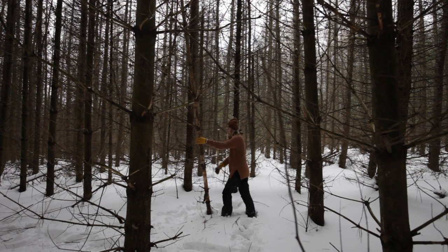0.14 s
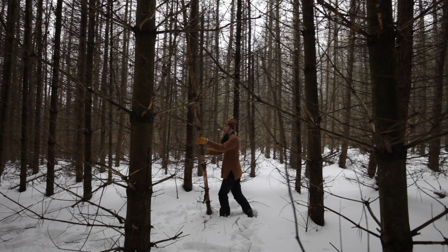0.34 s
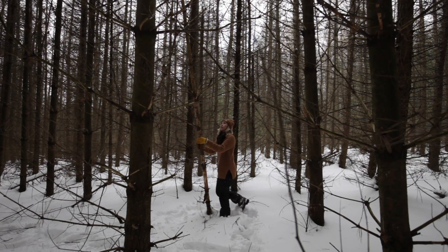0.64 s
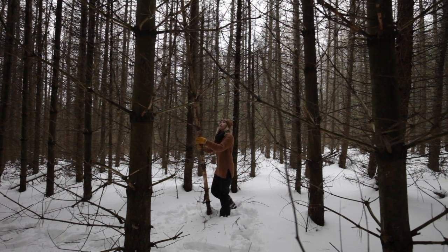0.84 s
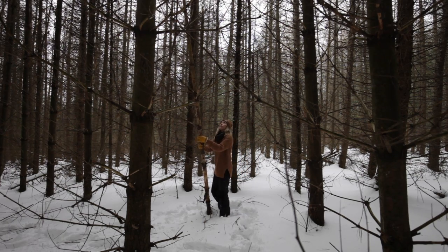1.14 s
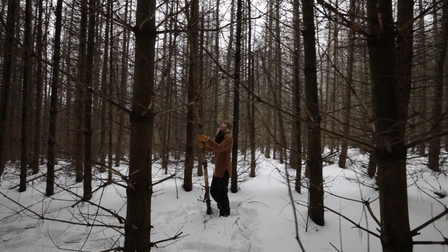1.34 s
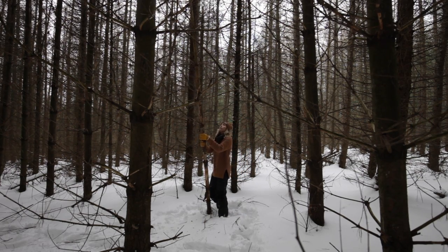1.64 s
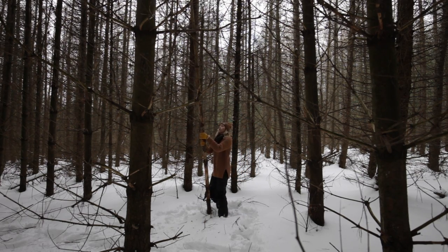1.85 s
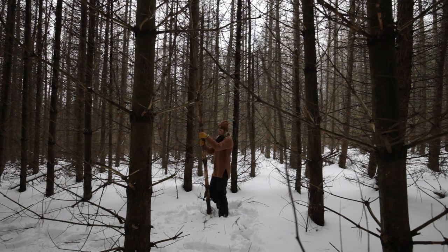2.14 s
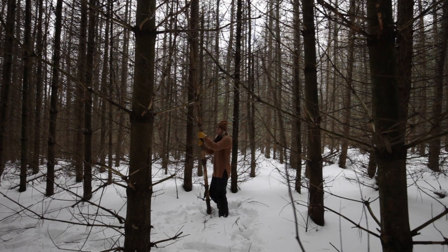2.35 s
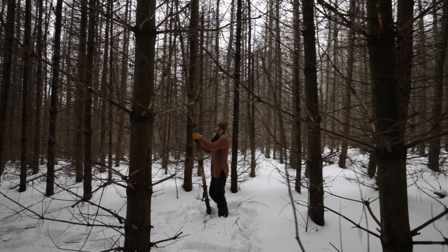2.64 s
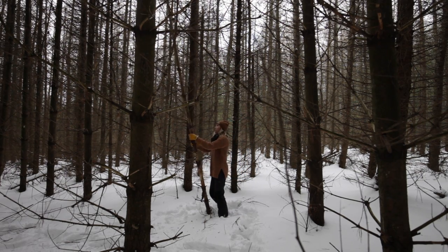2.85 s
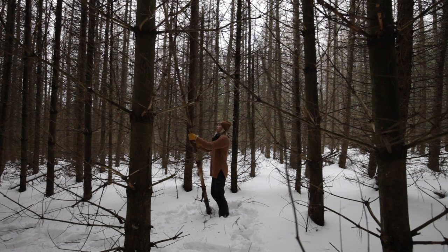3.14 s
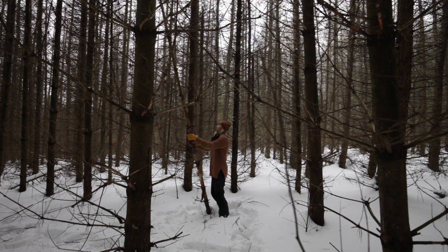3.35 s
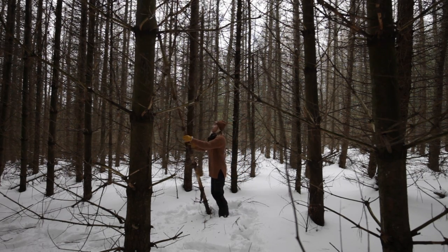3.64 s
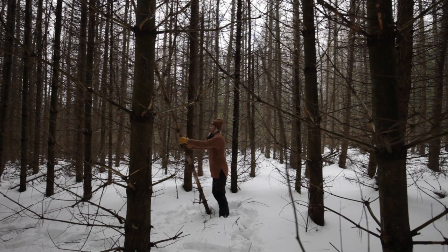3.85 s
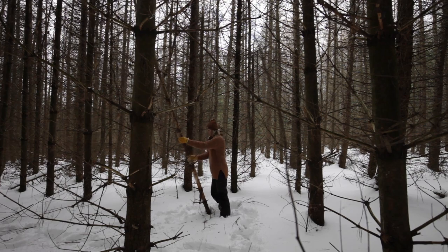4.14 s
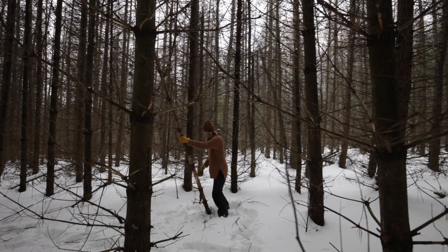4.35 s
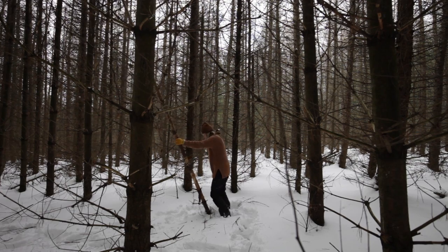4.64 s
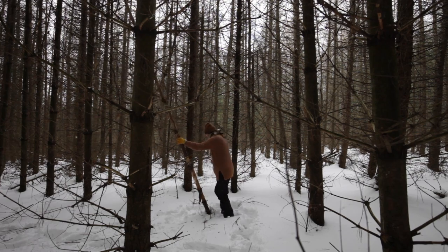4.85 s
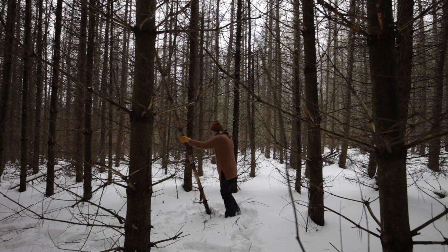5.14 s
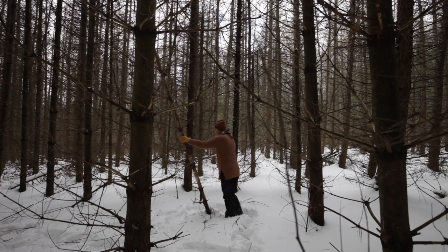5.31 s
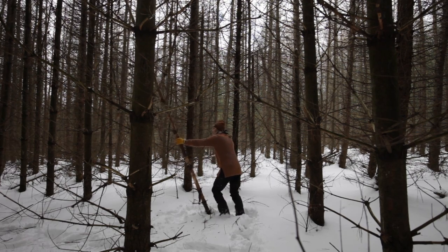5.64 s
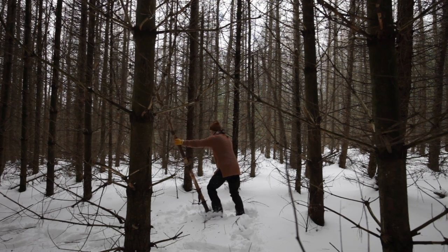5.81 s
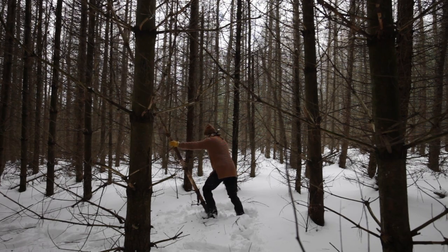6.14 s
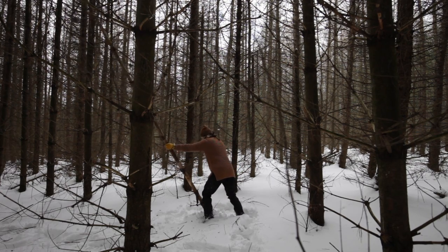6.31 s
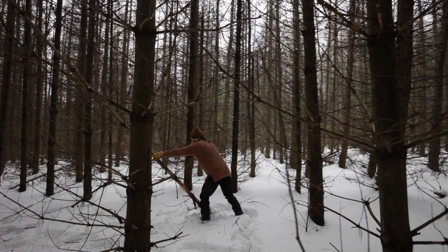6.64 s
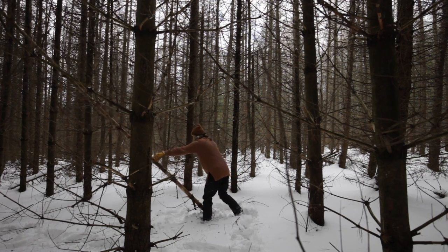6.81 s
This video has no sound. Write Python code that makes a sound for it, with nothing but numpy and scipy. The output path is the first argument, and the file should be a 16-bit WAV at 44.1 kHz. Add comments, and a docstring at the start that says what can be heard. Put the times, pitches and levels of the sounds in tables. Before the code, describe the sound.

Dry twigs crackle and snap in clumped bursts as a dead tree is shoved over in snowy woods, with dull boot thuds and a big crack near the end.

```python
"""Pushing over a dead tree in a snowy wood

A dead tree is rocked and pushed over by hand, shove by shove: each builds up strain, then lets go.
Dry fibres and twigs snap as noise bursts coloured by pitch; the brittle crown crackles and scrapes in
clumped ticks and knocks through its neighbours in short rings. Dull low pushes are boots treading the snow
and the trunk shifting. Shaped noise makes the air; near and far trunks scatter a short echo of the wood."""
import sys
import numpy as np
from scipy import signal
from scipy.fft import rfft, irfft
from scipy.io import wavfile
from scipy.ndimage import uniform_filter1d

SR = 44100
rng = np.random.default_rng(int(sys.argv[2]) if len(sys.argv) > 2 else 0)


def master(y):
    """Save y as 16-bit WAV."""
    cut = np.clip(np.atleast_2d(y).T, -1, 1)
    pcm = np.round(cut * 32767)  # scale
    wavfile.write(sys.argv[1], SR, pcm.astype(np.int16))


N = 307377


def gain_of(db):
    """Decibels to amplitude."""
    return 10 ** (np.asarray(db) / 20)


def evened(x):
    """Scales to rms 1."""
    return x / np.sqrt(np.mean(x ** 2) + 1e-20)


def read(points, hz):
    """Reads a table of values against frequency on a log-frequency axis."""
    f, value = np.transpose(points)
    return np.interp(np.log(hz + 1), np.log(f), value)


def add(mix, s, sound):
    """Mixes a sound in at time s."""
    part = mix[max(round(s * SR), 0):][:len(sound)]
    part += sound[:len(part)]


def coloured(x, spectrum):
    """Gives x a spectrum, at rms 1."""
    hz = np.fft.rfftfreq(len(x), 1 / SR)
    return evened(irfft(rfft(x) * gain_of(read(spectrum, hz)), len(x)))


def lumpy(first_size, second_size):
    """Slow random swells at rms 1: noise averaged twice over these numbers of samples."""
    once = uniform_filter1d(rng.standard_normal(N), size=first_size)
    return evened(uniform_filter1d(once, size=second_size))


def causal(db):
    """Frequency response with this gain that rings only after it is struck."""
    log_gain = np.log(gain_of(np.r_[db, db[-2:0:-1]]))
    return np.exp(np.conj(signal.hilbert(log_gain)))[:len(db)]


# wandering level of the low rumble: time_s, level_db
RUMBLE_LEVEL = [(0.0, -57), (0.35, -54.5), (1.1, -68), (1.55, -57), (2.0, -65), (2.4, -68), (2.9, -54.5),
                (3.3, -70), (3.6, -58), (3.86, -55.5), (4.4, -50), (4.78, -64.5), (5.15, -56), (5.4, -47),
                (5.52, -55), (5.88, -48), (6.2, -71), (6.5, -55), (6.97, -59.5)]


def low_rumble(gust_db=4.0):
    """A lumpy low rumble under the wood: bass noise on a wandering level with random gusts."""
    bass = [(15, -4.5), (40, 8.0), (110, 1.5), (220, -12), (600, -12.5), (3000, -64)]  # hz, dB per Hz
    rumble = coloured(rng.standard_normal(N), bass)
    wander_db = np.interp(np.arange(N) / SR, *np.transpose(RUMBLE_LEVEL))
    return rumble * gain_of(wander_db + gust_db * np.tanh(lumpy(3000, 1500)))


RUSH_DB, RUSH_ENDS_S, RUSH_FADE_DB_PER_S, STILL_DB = -47, 1.83, 26, -61
# relative spectrum of the air among the trees: frequency_hz, level_db (per Hz)
RUSH_SPECTRUM = [(20, -20), (100, -2), (180, 0), (300, 1), (800, -1), (1200, -3.5), (2000, -19),
                 (7000, -23), (11000, -25.5), (16000, -35)]


def rush():
    """A soft rush of air among the trees, steady noise that fades to a still floor."""
    t = np.arange(N) / SR
    breeze = gain_of(RUSH_DB - RUSH_FADE_DB_PER_S * np.maximum(t - RUSH_ENDS_S, 0))
    return coloured(rng.standard_normal(N), RUSH_SPECTRUM) * np.hypot(breeze, gain_of(STILL_DB))


# a heavy tread also crushes the crust, which sounds higher; below HEAVY_DB the crust weakens further
CRUST_DB, CRUST_HZ, CRUST_DELAY_S, HEAVY_DB = -8, 270, 0.0033, -17
# dull thuds of boots and trunk: time_s, level_db, pitch_hz
THUDS = [(0.094, -38, 111), (0.17, -40, 135), (0.538, -35.5, 121), (1.605, -37, 150), (2.573, -38, 73),
         (3.063, -37, 116), (3.85, -43, 64), (4.032, -40, 131), (4.267, -37, 99), (4.3, -28.5, 74.5),
         (4.944, -34.5, 82), (5.254, -21.5, 103), (5.287, -29, 126), (5.348, -21, 112), (5.571, -30, 128),
         (5.635, -37, 74), (5.749, -40, 130), (5.801, -40, 74.5), (5.932, -35, 68), (6.815, -38.5, 116)]


def thuds(swell_s=0.0094, cycles=0.67, settle_s=0.017, settle_db=-9.0):
    """A soft push of a cycle or two, then a short rumble as the snow packs down."""
    out, t = np.zeros(N), np.arange(-1024, 8192) / SR
    snow = [(15, -38), (45, -5.0), (130, -3.5), (280, -15.0), (500, -29.0), (2000, -44), (8000, -85)]
    for s, level_db, hz in THUDS:
        push = np.exp(-(t * hz / cycles) ** 2) * np.cos(2 * np.pi * (hz * t + rng.random()))
        crust = np.exp(-((t - CRUST_DELAY_S) * CRUST_HZ / 2) ** 2)
        crust *= np.cos(2 * np.pi * (CRUST_HZ * t + rng.random()))
        crust *= gain_of(CRUST_DB + min(level_db - HEAVY_DB, 0))
        rumble = coloured(rng.standard_normal(len(t)), snow)
        packing = np.exp(np.minimum(t / swell_s, -t / settle_s))
        thud = push + crust + gain_of(settle_db) * rumble * packing
        add(out, s + t[0], gain_of(level_db) * thud)
    return out


# a shove bites, builds from slack to full strain, eases off a little, then lets go
BITE_S, SLACK_DB, EASE_DB_PER_S, LET_GO_DB_PER_S = 0.017, -9, 7, 90
# once let go, the crown sways and rustles on
SWAY_DB, SWAY_FADE_DB_PER_S = -11.5, 13
TWIGS_AT_REST_DB, LIMBS_AT_REST_DB = -53.5, -56
# shoves dragging the crown through other branches, with drag levels at full strain:
# start_s, end_s, build_s (to full strain), twigs_db, limbs_db, boughs_db
SHOVES = [(-.03, 0.43, 0.2, -59, -69, -61), (1.067, 1.31, .14, -40, -47, -56),
          (1.298, 1.364, 0.033, -28.5, -45, -64), (1.4, 1.644, 0.055, -29, -37, -49.5),
          (1.63, 1.844, 0.069, -22, -39, -43), (1.837, 2.13, 0.098, -24.5, -32, -46),
          (2.446, 3.084, 0.39, -31.5, -43.5, -44.5), (3.405, 4.103, 0.39, -31.5, -37.5, -51.5),
          (4.216, 4.33, 0.031, -44.5, -49, -55.5), (4.394, 4.695, .04, -41.5, -46, -52.5),
          (4.902, 5.22, 0.028, -45.5, -49.5, -57.5), (5.49, 5.975, 0.16, -46.5, -51, -55),
          (5.927, 6.185, 0.22, -38, -43.5, -62), (6.215, 6.38, 0.079, -31, -37, -57),
          (6.406, 6.604, 0.12, -32, -40, -65), (6.615, 6.766, 0.071, -37.5, -35, -63),
          (6.896, 7.002, 0.077, -34.5, -43, -64)]


def drag():
    """How hard twigs, limbs and boughs are moved: each shove builds strain, then releases it."""
    t = np.arange(N) / SR
    power = np.zeros((3, N))
    for start, end, build, *levels_db in SHOVES:
        first = max(round(start * SR), 0)
        age = t[first:] - start
        slack_db = SLACK_DB * np.clip(1 - age / build, 0, 1)
        strain_db = slack_db - EASE_DB_PER_S * np.maximum(age - build, 0)
        since = np.maximum(t[first:] - end, 0)
        release_db = np.maximum(-LET_GO_DB_PER_S * since, SWAY_DB - SWAY_FADE_DB_PER_S * since)
        shove = np.clip(age / BITE_S, 0, 1) * gain_of(strain_db + release_db)
        power[:, first:] += np.outer(gain_of(levels_db), shove) ** 2
    twigs, limbs, boughs = np.sqrt(power)
    return np.hypot(twigs, gain_of(TWIGS_AT_REST_DB)), np.hypot(limbs, gain_of(LIMBS_AT_REST_DB)), boughs


# relative spectrum of boughs swishing through the air: frequency_hz, level_db (per Hz)
SWISH_SPECTRUM = [(60, -29), (200, -8.5), (400, -11), (650, -8.5), (900, -4.5), (1400, -6.5), (4000, -32)]


def swish(bough_drag):
    """Moving boughs stir the air: shaped noise that follows their drag."""
    return coloured(rng.standard_normal(N), SWISH_SPECTRUM) * bough_drag


# how long the far trunks scatter sound: frequency_hz, t60_s
SCATTER = [(200, 0.17), (1000, 0.1), (3000, 0.1), (6500, 0.53), (14000, 0.44)]


def echo(x, early_db=-16, early_t60=0.12, late_db=-15):
    """Near trunks return a quick spray of echoes, far ones a thin tail."""
    taps = rng.standard_normal(SR) * (rng.random(SR) < 3000 / SR)  # about 3000 a second
    taps[:60] = 0  # nothing returns at once
    hz, t, z = signal.stft(taps, SR, nperseg=256)
    fade = gain_of(-60 * t / read(SCATTER, hz)[:, None])
    late = signal.istft(z * fade, SR, nperseg=256)[1][:SR]
    early = taps * gain_of(-60 * np.arange(SR) / SR / early_t60)
    near = gain_of(early_db) * early / np.linalg.norm(early)
    far = gain_of(late_db) * late / np.linalg.norm(late)
    return signal.fftconvolve(x, near + far)[:N]


def forest(x, count=4):
    """Breaks lie at changing heights, so their echoes take changing paths; snow swallows the low part."""
    place = np.arange(N) / SR * 2.3  # rounds of the echo paths, 2.3 a second
    paths = np.arange(count)[:, None] / count
    shares = np.maximum(np.cos(2 * np.pi * (place + paths)), 0)
    echoes = sum(echo(x * share) for share in shares)
    return signal.sosfilt(signal.butter(1, 1500, "high", fs=SR, output="sos"), echoes)


def crackle(spectrum, per_s, spread_db, clump_db, rub, ring_s, count=128):
    """Tiny fractures, each twig with its own short ring and register, come in clumps over a smooth rub."""
    t, out = np.arange(200) / SR, np.zeros(N)
    for hz in np.geomspace(1200, 11000, count):
        tick = rng.standard_normal(len(t)) * np.exp(-t / (ring_s * rng.uniform(.8, 6)))
        register = signal.butter(1, [.88 * hz, 1.14 * hz], "band", fs=SR, output="sos")
        ring = np.sqrt(hz) * evened(signal.sosfilt(register, tick))  # equal power per Hz in every register
        gaps, strengths = rng.exponential(size=(400, 2)).T
        times = np.cumsum(gaps ** 2 / 2) * count / per_s  # each twig ticks in short runs
        sizes = gain_of(spread_db * np.minimum(strengths, 3.6))  # many small, a few large
        for s, size in zip(times[times < N / SR], sizes):
            add(out, s, size * ring)
    clumps = lumpy(400, 150)
    scrape = (evened(out) + rub * rng.standard_normal(N)) / np.hypot(1, rub)
    return coloured(scrape * gain_of(clump_db * clumps), spectrum)


# twig drag at which ticks and rub are equally strong
CROWDED_DB = -26
# relative spectra of thin twigs and thicker limbs: frequency_hz, level_db (per Hz)
TWIG_SPECTRUM = [(100, -25), (500, -8), (1400, -9.5), (2200, -2), (3100, 1), (4500, 1), (6400, 3.5),
                 (7800, 1.5), (10000, -8), (12500, -14), (16000, -24)]
LIMB_SPECTRUM = [(150, -26), (450, -31), (700, -4.5), (1400, -1), (1900, 5.5), (2400, 1.5), (3400, -9),
                 (5000, -4.5), (9000, -24)]


def crown(twig_drag, limb_drag, sparkle=0.065):
    """Thin twigs crackle and thicker limbs scrape as the crown is dragged along."""
    # a light touch ticks twig by twig; under a hard drag so many give at once that they merge
    crowding = (twig_drag / gain_of(CROWDED_DB)) ** .25
    twigs = crackle(TWIG_SPECTRUM, per_s=2300, spread_db=4.0, clump_db=1.1, rub=crowding, ring_s=0.00045)
    limbs = crackle(LIMB_SPECTRUM, per_s=650, spread_db=2.0, clump_db=3.0, rub=0.87, ring_s=0.0013)
    # a hard drag splinters the twigs and keeps more of their top; a light touch only brushes them
    top = signal.sosfiltfilt(signal.butter(3, 9000, "high", fs=SR, output="sos"), twigs)
    twigs = twigs + top * (twig_drag ** sparkle - 1)
    return twigs * twig_drag + gain_of(-3.0) * limbs * limb_drag


# dry limbs and trunk knocking, level before the low cut: time_s, level_db, pitch_hz, t60_s
KNOCKS = [(1.202, -37, 2250, 0.11), (1.24, -34, 2650, .06), (1.29, -31, 2350, 0.12),
          (1.317, -29, 2190, 0.32), (1.352, -28.5, 2104, 0.18), (1.446, -26, 2930, 0.33),
          (1.75, -26, 3330, 0.11), (2.044, -13.5, 2270, 0.025), (2.2065, -8, 1795, 0.018),
          (3.13, -2, 1100, 0.0051), (3.342, -24.5, 1850, 0.0097), (3.377, -18, 2070, 0.0041),
          (4.128, -27, 1650, 0.11), (4.312, -34.5, 1850, 0.074), (4.654, -22.5, 1920, 0.057),
          (4.965, -37, 1920, 0.048), (5.496, -35, 1690, 0.095), (5.697, -39, 2570, .08),
          (5.9916, -11, 590, 0.013), (6.021, -26, 1440, 0.018), (6.331, -20, 2740, 0.027),
          (6.626, -28, 2010, 0.057), (6.667, -19, 2200, 0.038), (6.71, -25, 1965, .048),
          (6.782, -30.5, 1843, 0.078)]


def knocks(overtone=1.7, overtone_db=-9):
    """A limb rings briefly on a bending mode and a weaker overtone, chattering against its neighbour."""
    out, t = np.zeros(N), np.arange(8000) / SR
    chatter = .21  # rms phase wobble, in turns
    for s, level_db, hz, t60 in KNOCKS:
        wobble = evened(uniform_filter1d(rng.standard_normal(len(t)), size=90))
        turns = hz * t + chatter * wobble
        upper = gain_of(overtone_db - 40 * t / t60) * np.sin(2 * np.pi * overtone * turns)
        tone = np.sin(2 * np.pi * turns) + upper
        ring = tone * (1 - np.exp(-t / 0.00022)) * gain_of(level_db - 60 * t / t60)
        # the wood radiates almost nothing below its mode
        low_cut = signal.butter(4, 0.77 * hz, "high", fs=SR, output="sos")
        add(out, s, signal.sosfilt(low_cut, ring))
    return out


PULSE_RISE_S = .00006  # from rest to peak
# short one-sided pulses at two of the hardest cracks: time_s, peak_db
LOW_PULSES = [(2.206, -14.5), (5.9901, -6)]


def low_pulses():
    """At two of the hardest cracks comes a single short one-sided pulse that reaches down to the bass."""
    out, t = np.zeros(N), np.arange(512) / SR
    for s, peak_db in LOW_PULSES:
        add(out, s, gain_of(peak_db) * t / PULSE_RISE_S * np.exp(1 - t / PULSE_RISE_S))
    return out


# thick wood breaks over a wide band, thin twigs close to their own pitch: fall-off in dB per octave
THICK_FOCUS_DB, THIN_FOCUS_DB, THIN_HZ = 5, 18.5, 7360  # the thin part is added on as pitch rises
# even a thin twig keeps some body far from its pitch
BODY_DB = -20.5
# each piece of wood stands out in a narrow band at its own pitch
OWN_RING_DB, OWN_RING_OCTAVES = 3.5, .13
# relative spectrum common to all dry breaks: frequency_hz, level_db (per Hz)
DRY_WOOD_SPECTRUM = [(100, -10.5), (700, 3.5), (4500, 2), (6300, 3), (7800, 1.5), (10000, -6.5),
                     (13000, -15), (16000, -27)]


def snap(level_db, tear_s, hz, lead_s, size=2048, lead_db=-15):
    """Fibres strain for an instant, then give way in a burst; the thinner the wood, the higher it sounds."""
    t, f = np.arange(size) / SR - lead_s, np.fft.rfftfreq(size, 1 / SR)
    u = t / max(tear_s, 1e-4)
    after = np.maximum(u, 0)
    tearing = np.minimum(.5 + 3 * after, 1) * (np.exp(-after ** 2) + 0.8 * np.exp(-after / 2))
    strain = gain_of(lead_db) * np.exp(-abs(u))
    # a few fibres are much stronger
    fibres = rng.standard_normal(size) * gain_of(4.6 * rng.standard_normal(size))
    burst = rfft(fibres * np.where(t < 0, strain, tearing))
    # every break excites all bands
    band_power = uniform_filter1d(abs(burst) ** 2, size=24)
    burst *= causal(-10 * np.log10(band_power + 1e-12))
    focus_db = THICK_FOCUS_DB + THIN_FOCUS_DB * (hz / THIN_HZ) ** 6
    from_pitch = np.log2((f + 20) / hz)  # octaves
    octaves = np.hypot(from_pitch, .5) - .5  # rounded off near the pitch
    colour_db = read(DRY_WOOD_SPECTRUM, f) + np.maximum(-focus_db * octaves, BODY_DB)
    colour_db += OWN_RING_DB * np.exp(-(from_pitch / OWN_RING_OCTAVES) ** 2)
    crack = irfft(burst * causal(colour_db))
    # the level is that of the whole crack's energy spread over 4 ms
    return gain_of(level_db) * crack * np.sqrt(.004 * SR / np.sum(crack ** 2))


# small twigs that give way by chance during a shove; levels are before the drag, tearing time is a mean
STRAY_PER_S, STRAY_DB, STRAY_SPREAD_DB, STRAY_TEAR_S = 28, -13.5, 4, 0.0017
STRAY_LOW_HZ, STRAY_HIGH_HZ = 2600, 8700
# stray twigs also tick when the crown is almost at rest: dB of their level per dB of drag
STRAY_FOLLOW = 0.84


def stray_snaps(twig_drag, count=300):
    """Small twigs break at random, louder the harder the crown is dragged."""
    out = np.zeros(N)
    gaps, sizes, pitches, tears = rng.random((count, 4)).T
    times = np.cumsum(2 * gaps) / STRAY_PER_S
    for s, size, pitch, tear in zip(times, sizes, pitches, tears):
        level_db = STRAY_DB + STRAY_SPREAD_DB * (2 * size - 1)
        hz = STRAY_LOW_HZ + (STRAY_HIGH_HZ - STRAY_LOW_HZ) * pitch
        if s < N / SR:
            add(out, s, snap(level_db, STRAY_TEAR_S * 2 * tear, hz, lead_s=0))
    return out * twig_drag ** STRAY_FOLLOW


# wood breaking: time_s, level_db (over 4 ms), tear_s, pitch_hz
SNAPS = [(0.153, -40, 0.0055, 7800), (0.323, -39.5, 0.0036, 7360), (0.429, -42, 0.006, 5600),
         (.533, -37.5, 0.0058, 3520), (1.4513, -32, 0.0015, 3600), (1.5072, -35, .001, 3900),
         (1.6405, -26, 0.0025, 3900), (1.673, -20, 0.0024, 4600), (1.7035, -20.5, 0.00073, 6600),
         (1.72, -26, 0.0027, 5040), (1.7364, -25, .001, 4800), (1.7778, -20, 0.0078, 4000),
         (1.8254, -25, 0.0018, 5030), (1.9009, -21, 0.002, 4130), (1.985, -19, 0.004, 5800),
         (1.9853, -22, .005, 10100), (1.9903, -15, .0007, 5750), (2.0406, -16.5, 0.0014, 4300),
         (2.067, -24, .0015, 6540), (2.1293, -25, 0.0014, 5500), (2.1484, -12.5, 0.0069, 5530),
         (2.1988, -19, 0.0026, 5930), (2.2074, -9, 0.0013, 6040), (2.2197, -17.5, 0.0016, 5700),
         (2.2923, -29, 0.0016, 5300), (2.4443, -34, 0.0013, 4870), (2.5326, -27, 0.0048, 3170),
         (2.6263, -37.5, .0008, 6100), (2.786, -20, 0.008, 7300), (2.8866, -18, 0.015, 4530),
         (2.891, -18, 0.016, 7200), (3.09, -15, .0007, 5900), (3.1274, -8.5, 0.0024, 5240),
         (3.4255, -30.5, 0.0013, 7140), (3.4307, -27, 0.0021, 6400), (3.5634, -31, .0008, 7000),
         (3.6, -38, .0008, 6050), (3.76, -19.5, 0.0028, 6660), (3.7903, -13.5, 0.00078, 6570),
         (3.7969, -14, 0.018, 6100), (3.857, -28, 0.00077, 6600), (4.0116, -24.5, 0.004, 5670),
         (4.1288, -16.5, 0.00089, 6040), (4.1337, -19.5, 0.00027, 6040), (4.151, -35, .0006, 6200),
         (4.229, -33, 0.00048, 6740), (4.4724, -35, 0.0008, 5030), (4.651, -12, 0.0006, 6300),
         (4.7454, -26, 0.00035, 8100), (4.7548, -29, 0.0011, 4000), (4.764, -25, 0.00061, 4750),
         (4.943, -34, 0.0028, 6400), (5.0614, -22, 0.0033, 6150), (5.203, -37.5, 0.006, 3480),
         (5.4939, -23, 0.00082, 5800), (5.6714, -35.5, .0006, 7000), (5.9147, -20, 0.0019, 5700),
         (5.9888, -18, 0.0039, 1190), (5.9923, -7.5, 0.00084, 3000), (5.9931, -10, 0.0003, 6140),
         (6.0204, -19, 0.00088, 5000), (6.039, -22, 0.0028, 4000), (6.1176, -23, 0.005, 6600),
         (6.14, -23, 0.009, 6900), (6.1551, -25, 0.0024, 5730), (6.2833, -18, 0.0032, 5100),
         (6.2943, -23, 0.0013, 7000), (6.3427, -21.5, 0.0004, 6400), (6.3634, -15, 0.0026, 5300),
         (6.478, -24.5, 0.0038, 3240), (6.4952, -13.5, 0.00031, 7260), (6.5149, -24, 0.0033, 5300),
         (6.5622, -27, .0008, 6800), (6.5933, -20, 0.0013, 3870), (6.6643, -30, 0.004, 2780),
         (6.685, -25, 0.0014, 4960), (6.7623, -16.5, 0.00084, 6060), (6.7819, -32, .001, 5300),
         (6.877, -25.5, 0.0021, 7100)]


def snaps():
    """The main breaks of the tree, each with its moment of strain ahead of it."""
    out = np.zeros(N)
    lead_s = .003
    for s, *row in SNAPS:
        add(out, s - lead_s, snap(*row, lead_s=lead_s))
    return out


def scene():
    """The wood and its echo, over thuds and air."""
    twig_drag, limb_drag, bough_drag = drag()
    air = low_rumble() + rush() + swish(bough_drag)
    wood = crown(twig_drag, limb_drag) + knocks() + low_pulses() + stray_snaps(twig_drag) + snaps()
    return (air + thuds() + forest(wood) + wood)[None]


EDGE_HZ = 16200


def record(dry):
    """Peaks beyond full scale overload the microphone input and clip flat; then a steep treble limit."""
    clipped = np.clip(dry, -1, 1)
    band_limit = signal.firwin(511, EDGE_HZ, window=("kaiser", 9), fs=SR)
    return signal.oaconvolve(clipped, band_limit[None], "same")


dry = scene()
out = record(dry)
master(out)
```